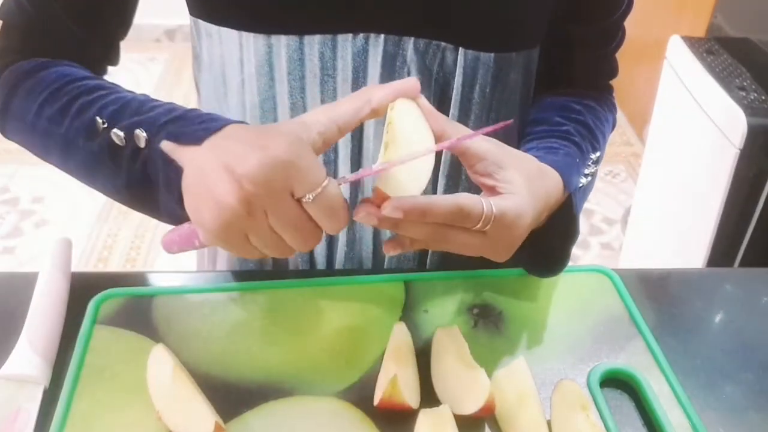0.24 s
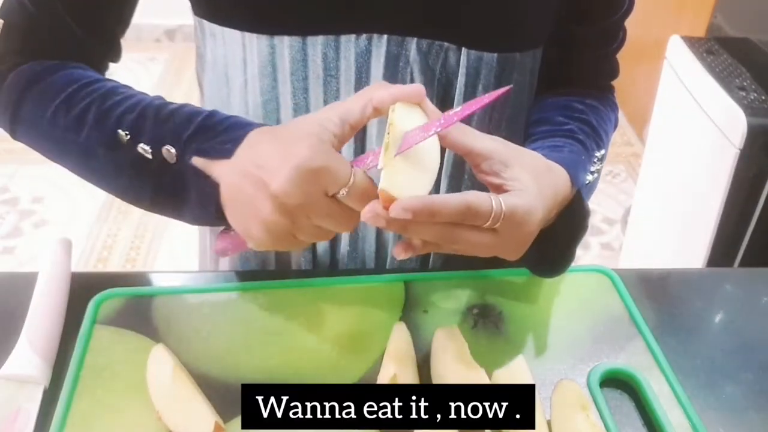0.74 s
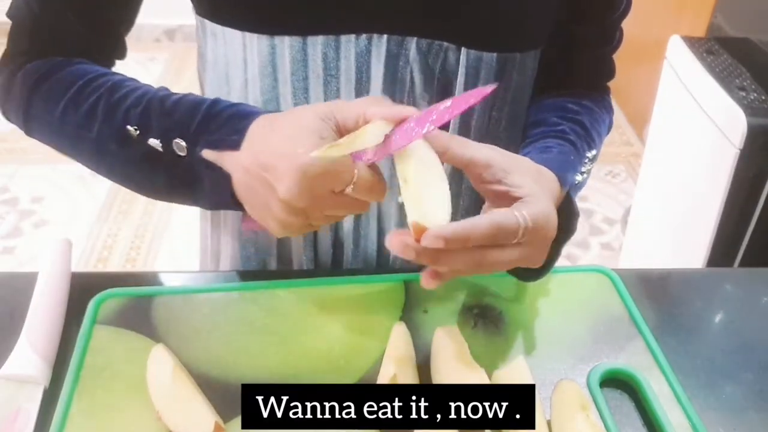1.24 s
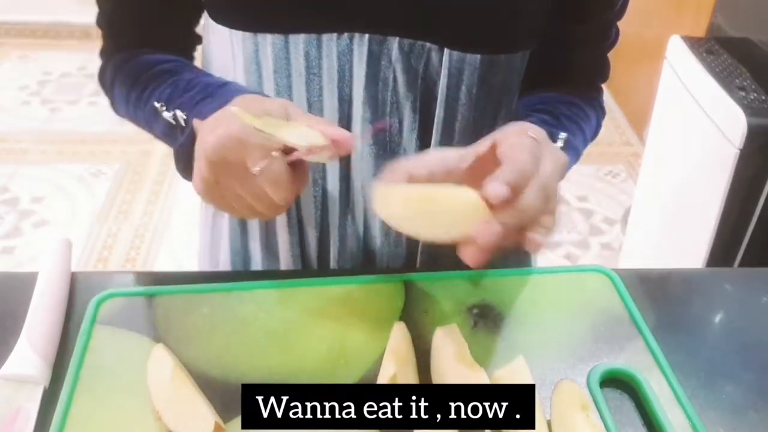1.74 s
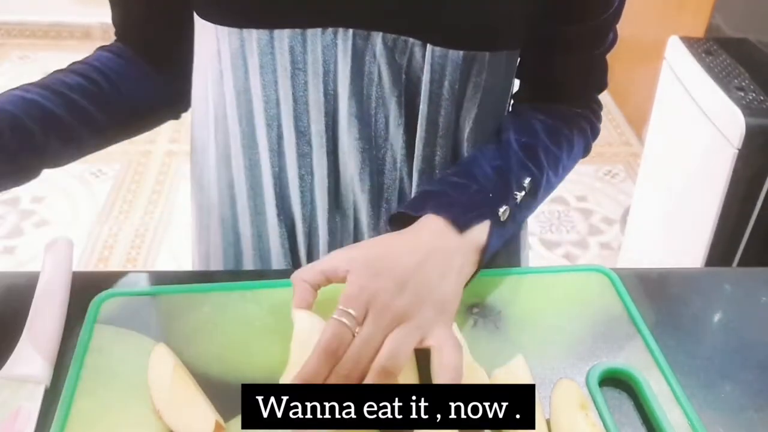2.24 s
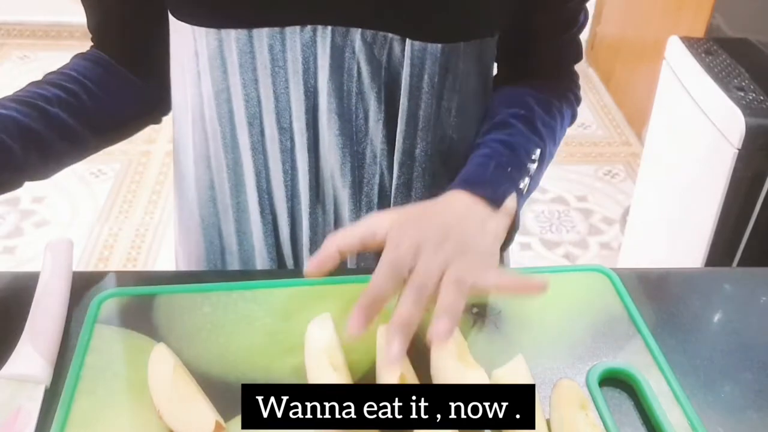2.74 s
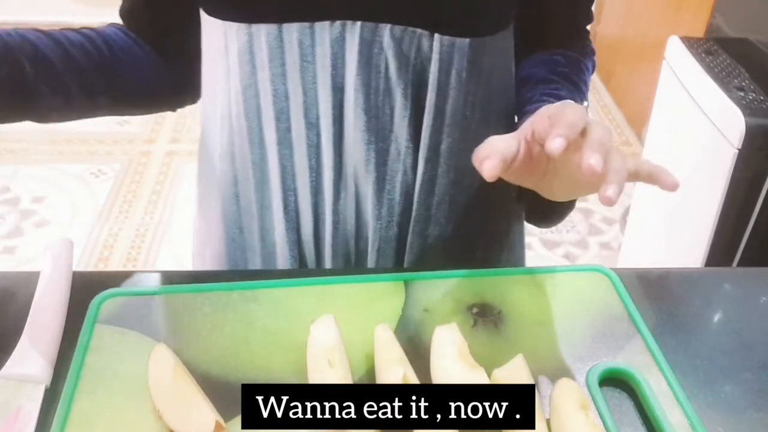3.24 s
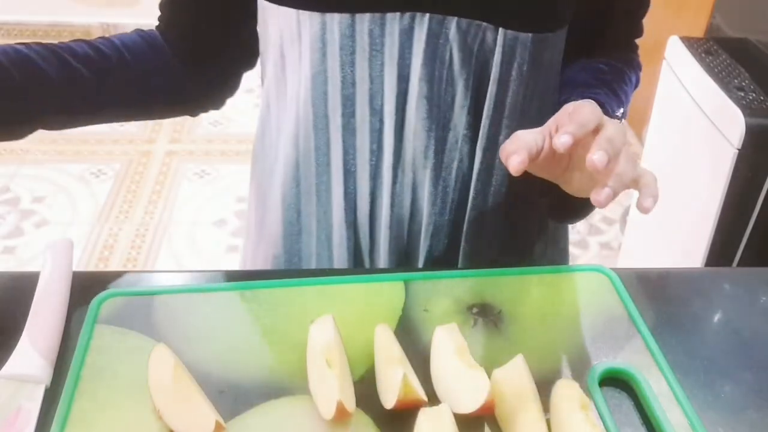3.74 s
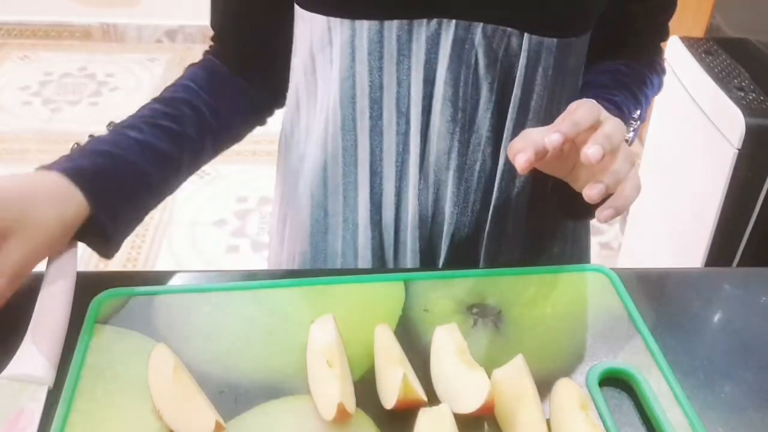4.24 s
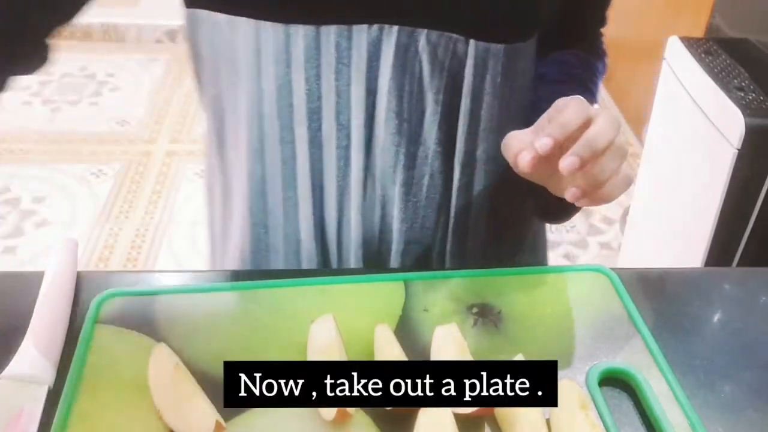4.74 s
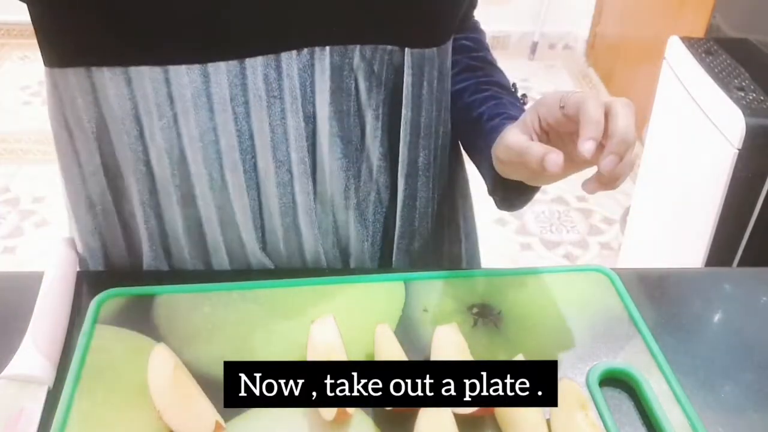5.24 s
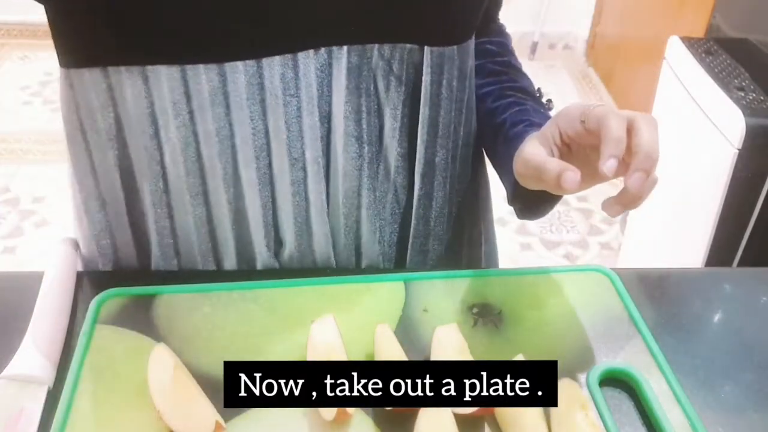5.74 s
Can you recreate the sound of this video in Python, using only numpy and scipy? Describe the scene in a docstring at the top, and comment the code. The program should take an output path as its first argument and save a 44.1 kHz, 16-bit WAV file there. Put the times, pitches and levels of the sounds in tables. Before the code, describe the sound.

A knife crunches softly through apple, then clatters onto a counter, and a glass dish clinks over a low, distant engine throb.

```python
"""Apple and glass dish in a tiled kitchen

Close to a stereo microphone, a knife crunches through a wedge of apple as it peels it. The wedge taps
a plastic board; the knife clacks and rings as it is laid on the counter. Then a glass dish is nudged
and clinks against crockery as it is taken out. Farther off, under a faint hiss, a low throb comes
through the walls, probably an engine outside that idles, revs once and settles."""
import sys
import numpy as np
from scipy import signal
from scipy.fft import rfft, irfft
from scipy.io import wavfile
from scipy.ndimage import map_coordinates

SR = 44100
rng = np.random.default_rng(int(sys.argv[2]) if len(sys.argv) > 2 else 0)


def to_wav(sig):
    """Store sig (one row per channel, or 1-D mono) as 16-bit WAV at the path in sys.argv[1].

    Samples outside -1..1 are clipped; the rate is SR.
    """
    pcm = np.clip(np.atleast_2d(sig), -1, 1) * 32767
    pcm = np.round(pcm).astype(np.int16)
    wavfile.write(sys.argv[1], SR, pcm.T)  # frames by channels


N = 264600
TIME = np.arange(N) / SR

# the blade bites and jumps forward: t/s, level/dB, decay/s
BITES = [(.284, -55.5, 0.0045), (.379, -47.5, 0.0073), (.479, -46.5, 0.015), (.518, -45, 0.011),
         (.792, -49, 0.025)]
# tone of a bite: f/Hz, level/dB
BITE_TONE = [(900, -21), (1700, -13), (2200, 5), (2900, -1.5), (4000, -2), (6000, 0.5), (9000, -12.5),
             (15000, -10.5)]
# each push of the blade swells and ebbs: peak t/s, level/dB, half length/s
PUSHES = [(0.522, -57.5, 0.028), (0.692, -61, 0.082), (0.798, -49, 0.013), (0.815, -35.5, 0.0115),
          (1.034, -55, 0.094)]
# cells bursting under the blade: f/Hz, level/dB
CRUNCH_TONE = [(350, -45), (600, -33), (1600, -17.5), (2180, -11), (3800, -10), (4200, -5.5), (4700, -5),
               (5790, 1.5), (8620, -5.5), (11700, 0), (16000, -5)]
# resonances of the gripped blade: f/Hz, level/dB, width/Hz
GRIPPED_BLADE = [(2150, 4, 90), (4180, 11, 90), (5630, -2, 110), (7240, 9, 170), (10900, 11, 260),
                 (11700, -7.5, 150)]
# the flesh tearing open: f/Hz, level/dB
TEAR_TONE = [(300, 7.5), (600, -3.5), (1150, -3.5), (1600, -5.5), (2300, -13.5), (4000, -26.5), (8000, -21)]
# the peel snaps off, the wedge taps the board: t/s, level/dB, decay/s
APPLE_TAPS = [(1.5725, -30, 0.00069), (1.576, -49.5, 0.0036), (1.618, -54.5, 0.017), (2.592, -39.5, 0.0021)]
# tone of snap and tap: f/Hz, level/dB
TAP_TONE = [(350, -21.5), (600, -6), (880, -4.5), (1490, -14.5), (2040, -6.5), (2500, -13), (3300, -8),
            (4460, -14.5), (6460, -1), (8860, -7.5), (15100, -7.5), (16000, -29)]
# wet fingers slip and tick on the fruit: t/s, level/dB, decay/s
SLIPS = [(1.479, -57, .0012), (2.6, -56.5, 0.086), (3.03, -59, 0.0031), (3.116, -44, 0.0009),
         (3.47, -59, 0.0011)]
# tone of a slip: f/Hz, level/dB
SLIP_TONE = [(1500, -14), (3000, -15.5), (3600, -17), (4200, -3), (5200, -4.5), (6800, -0.5), (8000, -24),
             (15000, -38.5)]
# short, rough squeaks on the apple's skin: t/s, level/dB, decay/s
SQUEAKS = [(2.159, -64.5, 0.0082), (2.18, -61.5, .008), (2.32, -67.5, 0.057)]
# tone of a squeak: f/Hz, level/dB
SQUEAK_TONE = [(2500, -28), (3850, -16), (4170, -4.5), (4500, -10), (8000, -28.5)]
# the brushing sleeve: f/Hz, level/dB
SLEEVE_TONE = [(300, -2.5), (600, 8), (1100, -4), (1600, -10.5), (2500, -4), (3700, -15.5), (4800, -8),
               (8000, -21.5), (15000, -33.5)]

# knife contacts: t/s, level/dB, decay/s, low edge of the clack/Hz (higher towards the tip)
KNIFE_HITS = [(4.111, -34, 0.021, 2470), (4.1152, -22, 0.0094, 810), (4.125, -18, 0.0058, 3570),
              (4.1305, -15.5, 0.011, 1490), (4.176, -29, 0.0023, 1000), (4.2127, -23, 0.0026, 3525),
              (4.361, -34, 0.0016, 4000), (4.386, -21.5, 0.0082, 6100), (4.389, -12.5, 0.0024, 7300),
              (4.4603, -25.5, 0.0054, 6000), (4.4675, -23, 0.0033, 1000), (4.491, -11.5, 0.0017, 8240),
              (4.515, -25, 0.0065, 5080)]
# the knife's clack: f/Hz, level/dB
CLACK_TONE = [(400, 2), (900, -5.5), (1500, -64), (2300, 2.5), (3800, -6.5), (5000, -2.5), (6300, 6),
              (8500, -7), (12000, -5), (15500, -9.5)]
# the blade's modes: f/Hz, level held/dB, level lying/dB, t60/s
KNIFE_MODES = [(2126, 1.5, -6.5, 0.19), (2185, -0.5, 3.5, 0.105), (2497, -17.5, -4, 0.084),
               (2877, -15.5, -8, 0.12), (5630, -23, -5.5, .12), (6270, -15.5, -6, .1),
               (7400, -14.5, -9, .12)]
# dull knocks on the counter: t/s, level/dB, decay/s
KNOCKS = [(4.115, -37, 0.047), (4.340, -28, 0.0078), (4.358, -39.5, 0.056), (4.469, -37, 0.027)]
# tone of a knock: f/Hz, level/dB
KNOCK_TONE = [(200, -19), (530, -10.5), (870, -2), (1400, -6.5), (2100, -4.5), (2900, -12.5), (8000, -33.5)]
# the worktop's woody modes: f/Hz, level/dB, t60/s
COUNTER_MODES = [(454, -7.5, 0.22), (604, 0.5, .14), (863, -0.5, 0.15), (910, -3.5, .1), (1082, -5, .18),
                 (1251, -4.5, 0.074)]

# glass contacts, grazing ones brighter: t/s, ring level/dB, crack level/dB, tilt/(dB per octave)
DISH_HITS = [(5.506, -49.5, -56, 4), (5.534, -49, -62, 3.5), (5.567, -49, -55, 2),
             (5.631, -15.5, -12.5, -1.2), (5.637, -21, -17, -1.5)]
# the hard crack of a glass contact: f/Hz, level/dB
CRACK_TONE = [(400, -20.5), (900, -18.5), (1500, -1.5), (2200, 0.5), (3300, -6.5), (4300, -16.5),
              (5400, -19.5), (6500, -29.5), (8100, -31), (9200, -59), (11000, -24), (15500, -46)]
# the glass dish's modes: f/Hz, level/dB, t60/s
DISH_MODES = [(876, -24, 0.17), (1302, -15.5, 0.33), (1360, -12.5, 0.42), (1570, -28, 0.36),
              (1840, -21.5, 0.41), (2360, -26, 0.18), (3176, 2, 0.28), (3243, 5, 0.067),
              (5470, -6.5, 0.047), (5690, -20.5, 0.079), (8000, -5.5, 0.053), (8170, -13, 0.038),
              (9970, -9.5, 0.13), (11700, -28, 0.068), (12030, -16.5, 0.19), (13700, -19, 0.055),
              (14750, -21, 0.038), (14840, -18.5, 0.07)]
# crockery bumps and slides on its shelf: t/s, level/dB, decay/s
BUMPS = [(5.225, -59, 0.062), (5.275, -58, 0.022), (5.506, -32, 0.063), (5.562, -32.5, 0.02),
         (5.631, -17, 0.0036), (5.6365, -24, 0.011)]
# tone of a bump: f/Hz, level/dB
BUMP_TONE = [(200, -27), (500, -20.5), (620, 0.5), (780, -15), (868, 9.5), (960, -2), (1450, 7),
             (2250, -5.5), (2800, -17.5), (4200, -32.5), (8000, -36), (15000, -54)]

# the engine's idle hunts a little: t/s, firing rate/Hz, throb level/dB
IDLE = [(0, 11.9, 5), (.15, 11.75, 0), (.68, 11.7, -1), (.85, 10.8, -1.5), (2.0, 10.8, -0.5),
        (4.0, 13.95, -3), (4.6, 13.95, -2.5), (4.8, 13.45, -3.5), (5.22, 13.3, -6), (5.4, 13.65, -2.5),
        (6, 13.35, -4)]
# the exhaust favours some multiples of the firing rate: order, level/dB
EXHAUST = [(2, -4), (3, -8.5), (4, -7), (5, 1), (6, 3), (7, -2.5), (9, -1.45)]
# low engine orders as heard through the walls: f/Hz, level/dB
BOOM_TONE = [(30, -44), (46, -14), (56, -15.5), (65, -10), (73, -20.5), (84, -1.5), (101, -9.5),
             (112.5, 1.5), (121, -15), (138, -8.5), (147, -21.5), (160, -3.5), (176, -20), (230, -27.5),
             (300, -67.5)]
# higher orders through the walls: f/Hz, level/dB
DRONE_TONE = [(150, -21), (190, 0), (209, 9.5), (226, -12), (245, -3), (256, 3), (270, 2.5), (292, -3),
              (318, 5.5), (345, -2.5), (385, -20), (450, -37)]
# the rush of exhaust gas: f/Hz, level/dB
RUSH_TONE = [(25, -12.5), (50, -2), (110, 13.5), (170, 11), (250, 1), (335, 12), (420, -1), (520, -12.5),
             (700, -18), (1100, -29.5), (2500, -38.5), (5000, -51)]
# steady background hiss: f/Hz, level/dB
HISS_TONE = [(320, -29.5), (550, -1), (670, -5.5), (772, -7.5), (1050, -3.5), (1320, -8), (1480, -9.5),
             (1750, -11.5), (3030, -4.5), (3640, -15), (4500, -18.5), (6580, -7.5), (8360, -30),
             (12900, -21), (16000, -34.5)]

# reverberation of the tiled room: f/Hz, t60/s
KITCHEN_T60 = [(300, 0.46), (1500, 0.71), (3000, 0.66), (6000, 0.75), (10000, 0.24), (16000, 0.44)]
# stereo width, long waves reaching both channels alike: f/Hz, side minus mid/dB
WIDTH = [(300, -9), (700, -4.5), (1250, 3.5), (2400, 0)]
# balance of the fruit at the microphone: f/Hz, left minus right/dB
FRUIT_SIDE = [(1000, 2), (2400, -1), (4400, -2), (8000, 1.5), (15000, 10)]
# balance of knife and counter: f/Hz, left minus right/dB
KNIFE_SIDE = [(1000, 1), (2400, -1), (4400, -2), (8000, 3), (15000, 7.5)]
# balance of the dish: f/Hz, left minus right/dB
DISH_SIDE = [(1000, 0.5), (1600, 0.5), (2500, 1), (4400, -3), (8000, 4.5), (15000, 8.5)]


def apple():
    """The blade bites, crunches and tears through; the peel snaps off and the wedge is set down."""
    tear = swell(s=0.913, db=-57.5, half_s=0.11) * colour(rng.standard_normal((2, N)), TEAR_TONE)
    crunch = peeling()
    bites = colour(bursts(BITES, grain_db=6), BITE_TONE)
    taps = colour(bursts(APPLE_TAPS, grain_db=-2), TAP_TONE)
    return crunch + tear + bites + taps


def peeling(from_s=0.081, to_s=1.22, fade_s=0.054, cells_per_s=1500, clump_db=6, sing_db=-10):
    """Cells burst in clumps of clicks under a light rub and each push; hard pushes make the blade sing."""
    rub = from_db(-71) * np.clip(np.minimum(TIME - from_s, to_s - TIME) / fade_s, 0, 1)
    pushes = sum(swell(*push) for push in PUSHES)
    rate = cells_per_s * from_db(clump_db * drift(40, N))
    cells = (rng.random(N) < rate / SR) * from_db(np.minimum(rng.exponential(1, N), 4))
    clicks = colour(cells * rng.choice([-1, 1], (2, N)), CRUNCH_TONE)
    crunch = np.hypot(rub, pushes) * rms_one(clicks)
    drive = pushes / pushes.max() * crunch
    sing = sum(from_db(sing_db + db) * signal.lfilter(*signal.iirpeak(hz, hz / width, fs=SR), drive)
               for hz, db, width in GRIPPED_BLADE)
    return crunch + sing


def hand():
    """Wet fingers slip and squeak on the wedge; the sleeve brushes along as the hand lifts."""
    squeaks = colour(bursts(SQUEAKS, grain_db=-2), SQUEAK_TONE)
    sleeve = swell(s=2.875, db=-60, half_s=0.19) * colour(rng.standard_normal((2, N)), SLEEVE_TONE)
    slips = colour(bursts(SLIPS, grain_db=-1.5), SLIP_TONE)
    return slips + squeaks + sleeve


def knife(lies_down_s=4.3, lying_t60_share=0.55, ring_db=5.5, ring_halving_hz=1004):
    """Each contact clacks and rings the blade, thinner and fainter at the tip; the counter damps it."""
    touches = blade = 0
    for s, db, decay, edge_hz in KNIFE_HITS:
        low_cut = signal.butter(2, edge_hz, "high", fs=SR, output="sos")
        touch = bursts([(s, db, decay)], grain_db=1.5)
        touches += signal.sosfilt(low_cut, touch + 1e-18 * np.cos(np.arange(N)))   # avoids underflow
    held = [(hz, db, t60) for hz, db, _, t60 in KNIFE_MODES]
    lying = [(hz, db, t60 * lying_t60_share) for hz, _, db, t60 in KNIFE_MODES]
    for s, db, _, edge_hz in KNIFE_HITS:
        modes = lying if s > lies_down_s else held
        blade += 0.5 ** (edge_hz / ring_halving_hz) * ring(s, db + ring_db, modes)
    clack = kitchen(colour(touches, CLACK_TONE), wet_db=-6, early_db=-9, early_s=0.008)
    return clack + kitchen(blade, wet_db=-5, early_db=-11.5, early_s=0.011)


def counter(ring_db=12.5):
    """Each knock is a dull thud that rings the worktop's woody modes in step with its energy."""
    thuds = colour(bursts(KNOCKS, grain_db=7.5), KNOCK_TONE)
    wood = sum(ring(s, db + ring_db + 10 * np.log10(decay), COUNTER_MODES) for s, db, decay in KNOCKS)
    return kitchen(thuds + wood, wet_db=-2, early_db=-10, early_s=0.012)


def dish(crack_s=0.0032, main_hz=3200):
    """Glass meets crockery: a dull bump, a hard crack and the dish's modes, tilted about its main ring."""
    contacts = [(s, db, crack_s) for s, _, db, _ in DISH_HITS]
    crack = colour(bursts(contacts, grain_db=4), CRACK_TONE)
    bumps = colour(bursts(BUMPS, grain_db=-5.5), BUMP_TONE)
    glass = 0
    for s, db, _, tilt in DISH_HITS:
        modes = [(hz, level + tilt * np.log2(hz / main_hz), t60) for hz, level, t60 in DISH_MODES]
        glass += ring(s, db, modes)
    impacts = kitchen(crack + bumps, wet_db=-5.5, early_db=-15, early_s=0.0099)
    return impacts + kitchen(glass, wet_db=-9, early_db=-6.5, early_s=0.01)


def engine(slow_hz=11, rev_hz=23, overtones_follow=0.65):
    """Beyond the walls, firings boom and drone and exhaust gas rushes; all three grow with speed."""
    idle_hz, throb_db = in_time(IDLE)
    firing_hz = idle_hz + (rev_hz - idle_hz) * rev()
    doublings = np.log2(firing_hz / slow_hz)
    boom = orders(firing_hz, BOOM_TONE, waver=0.39, apart_rad=0.24, echo_db=-7.5)
    boom *= from_db(-30.5 + 6.5 * doublings)
    drone = orders(firing_hz, DRONE_TONE, waver=0.63, apart_rad=0.13, echo_db=-0.5)
    drone *= from_db(-64 + 12 * doublings)
    gas = rng.standard_normal(N) + 1.2 * rng.standard_normal((2, N))
    rush = from_db(-55 + 14.5 * doublings) * rms_one(colour(gas, RUSH_TONE))
    fade_in = np.minimum(TIME / 0.01, 1)
    return fade_in * (from_db(throb_db) * boom + from_db(overtones_follow * throb_db) * (drone + rush))


def rev(at_s=1.68, rise_s=1.1, hold_s=0.27, fall_s=1.2):
    """Share of full revs, 0 to 1: an S-shaped climb, a hold, then a coast that flattens out."""
    climb = np.clip((TIME - at_s) / rise_s, 0, 1)
    coast = np.clip((TIME - at_s - rise_s - hold_s) / fall_s, 0, 1)
    return np.sin(np.pi / 2 * climb) ** 2 * (1 - coast) ** 2


def orders(firing_hz, tone, waver, apart_rad, echo_db, house_t60=0.59, step=20):
    """Firing harmonics swell as they cross resonances of the house, whose echoes blur the glides."""
    firing_hz = firing_hz[::step]   # bass needs few samples
    count = len(firing_hz)
    phase = 2 * np.pi * np.cumsum(firing_hz) * step / SR
    direct = 0
    for k in range(2, 38):
        smear = np.exp(1j * np.pi * k ** 2 / 5)   # the walls spread each firing over its cycle
        wander = waver * firing_hz / firing_hz.mean() * (drift(9, count) + 1j * drift(9.9, count))
        channels = np.exp(1j * apart_rad * (-1) ** k * np.array([[1], [-1]]))
        gain = from_db(at_hz(tone, k * firing_hz) + at_hz(EXHAUST, k))
        direct += gain * (channels * (smear + wander) * np.exp(1j * k * phase)).real
    age = TIME[:SR:step]
    tail = rms_one(rng.standard_normal(len(age)) * 1e-3 ** (age / house_t60)) / np.sqrt(len(age))
    echoes = from_db(echo_db) * signal.fftconvolve(direct, tail[None], axes=1)[:, :count]
    indoors = (direct + echoes) / np.hypot(1, from_db(echo_db))
    return signal.resample_poly(indoors, step, 1, axis=1)[:, :N]


def hiss(db=-68):
    """Faint, steady room tone, partly common to both channels."""
    noise = 0.74 * rng.standard_normal(N) + 0.63 * rng.standard_normal((2, N))
    return from_db(db) * colour(noise, HISS_TONE)


def kitchen(x, wet_db, early_db, early_s):
    """Close reflections off the counter, then a diffuse tail whose top treble dies first."""
    age = TIME[:int(0.8 * SR)]
    edges = np.geomspace(150, 19000, num=9)
    white = rfft(rng.standard_normal((2, len(age))))
    hz = np.fft.rfftfreq(len(age), 1 / SR)
    tail = 0
    for low, high in zip(edges, edges[1:]):
        band = irfft(white * (hz >= low) * (hz < high), len(age))
        tail += band * 1e-3 ** (age / at_hz(KITCHEN_T60, np.sqrt(low * high)))
    tail = rms_one(tail * (1 - np.exp(-age / 0.0023)))
    early = rms_one(rng.standard_normal((2, len(age))) * (age > 0.002) * np.exp(-age / early_s))
    echoes = (from_db(wet_db) * tail + from_db(early_db) * early) / np.sqrt(len(age))
    return x + signal.fftconvolve(x, echoes, axes=1)[:, :N]


def place(x, side):
    """Set a source's width and balance at the microphone, by frequency."""
    hz = np.fft.rfftfreq(N, 1 / SR)
    left, right = rfft(x)
    width, lean_db = from_db(at_hz(WIDTH, hz)), at_hz(side, hz) / 2
    channels = (left + right + width * (left - right) * [[1], [-1]]) / np.sqrt(2 + 2 * width ** 2)
    gains = from_db([lean_db, -lean_db])
    return irfft(channels * gains / np.sqrt(np.mean(gains ** 2, axis=0)), N)


def bursts(contacts, grain_db, grain_hz=1200):
    """Each contact (t/s, level/dB, decay/s) is a fast-dying scatter of tiny rebounds."""
    out, age = np.zeros((2, N + SR)), TIME[:SR // 3]
    for s, db, decay in contacts:
        rebounds = np.interp(age * grain_hz, np.arange(402), rng.standard_normal(402).clip(-1.7, 1.7))
        shape = rms_one(from_db(grain_db * rebounds)) * np.exp(-age / decay)
        start = int(s * SR)
        out[:, start:start + len(age)] += from_db(db) * shape * rng.standard_normal((2, len(age)))
    return out[:, :N]


def ring(s, db, modes):
    """One contact rings every mode (f/Hz, level/dB, t60/s), a quarter cycle apart left and right."""
    out, age = np.zeros((2, N + SR)), TIME[:SR // 3]
    waves = np.array([from_db(level - 60 * age / t60) * np.exp(2j * np.pi * hz * age)
                      for hz, level, t60 in modes])
    phases = np.exp(2j * np.pi * rng.random(len(modes))) * np.array([[1], [1j]])
    attack = 1 - np.exp(-age / 0.00096)
    start = int(s * SR)
    out[:, start:start + len(age)] = from_db(db) * (phases @ waves).real * attack
    return out[:, :N]


def colour(x, tone, size=16384):
    """Causal (minimum-phase) filter that keeps the power of white noise."""
    gain = rms_one(from_db(at_hz(tone, np.fft.rfftfreq(size, 1 / SR))))
    cepstrum = irfft(np.log(gain + 1e-9))[:size // 2]
    cepstrum[1:] *= 2
    impulse = irfft(np.exp(rfft(cepstrum, size)))
    return signal.oaconvolve(x, impulse[None], axes=1)[:, :N]


def swell(s, db, half_s):
    """A smooth rise and fall that peaks at time s."""
    return from_db(db) * np.exp(-((TIME - s) / half_s) ** 2)


def drift(per_s, count):
    """Smooth random wander of unit power."""
    knots = rng.standard_normal(256)
    return rms_one(map_coordinates(knots, [np.linspace(0, per_s * N / SR, count)], order=3, mode="wrap"))


def in_time(rows):
    """Each column of a curve at every sample."""
    s, *columns = np.transpose(rows)
    return [np.interp(TIME, s, column) for column in columns]


def at_hz(points, hz):
    """Read a table on a log-frequency axis."""
    f, value = np.transpose(points)
    return np.interp(np.log(np.maximum(hz, 1)), np.log(f), value)


def from_db(db):
    """Decibels to gain."""
    return 10 ** (np.asarray(db) / 20)


def rms_one(x):
    """Scale to unit power."""
    return x / np.sqrt(np.mean(x ** 2) + 1e-20)


def scene():
    """Fruit, knife and dish close by in one room, over a faint hiss and the engine outside."""
    fruit = kitchen(apple(), wet_db=-1, early_db=1, early_s=0.0072)
    fingers = kitchen(hand(), wet_db=-8.5, early_db=-7.5, early_s=0.006)
    return (place(fruit + fingers, FRUIT_SIDE) + hiss()
            + place(knife() + counter(), KNIFE_SIDE) + place(dish(), DISH_SIDE) + engine())


def record(dry, cutoff_hz=16300):
    """The microphone chain cuts the top steeply."""
    return signal.sosfilt(signal.ellip(10, 0.1, 80, cutoff_hz, fs=SR, output="sos"), dry)


dry = scene()
out = record(dry)
to_wav(out)
```